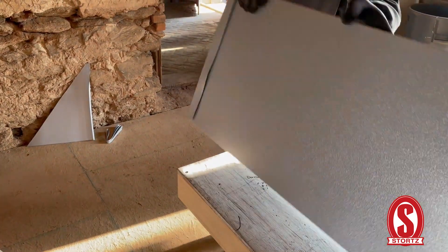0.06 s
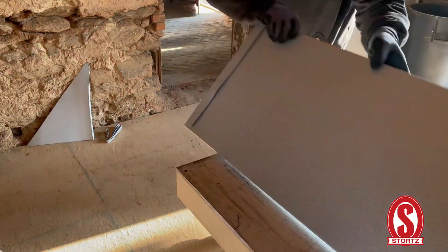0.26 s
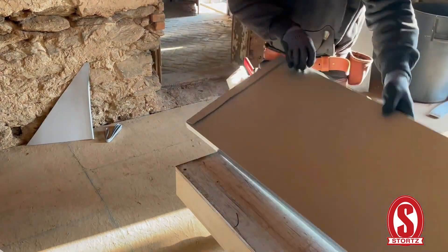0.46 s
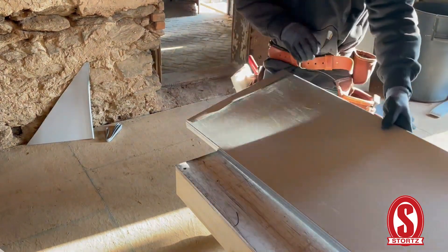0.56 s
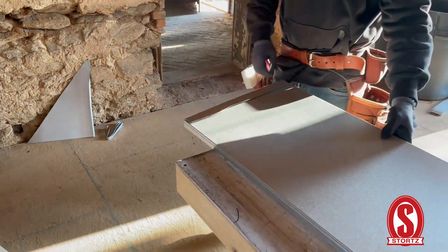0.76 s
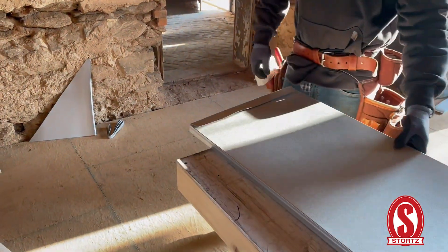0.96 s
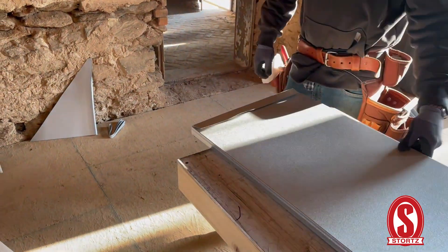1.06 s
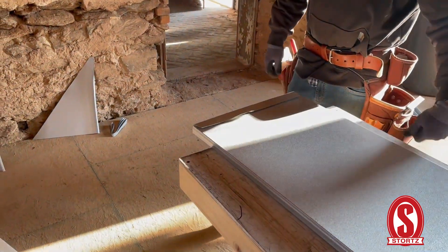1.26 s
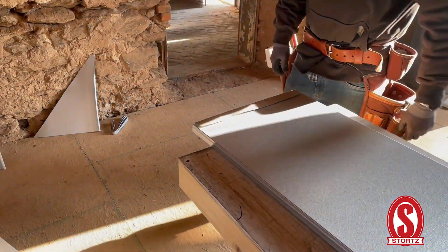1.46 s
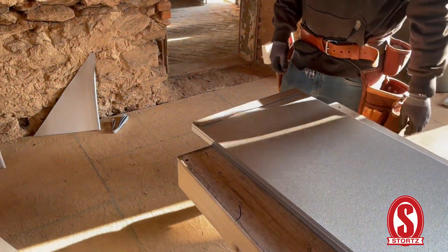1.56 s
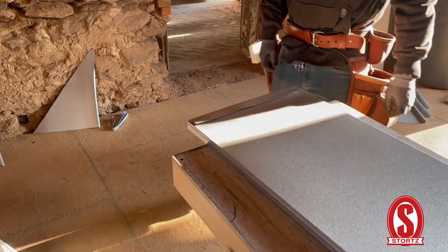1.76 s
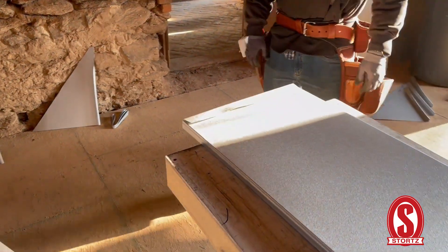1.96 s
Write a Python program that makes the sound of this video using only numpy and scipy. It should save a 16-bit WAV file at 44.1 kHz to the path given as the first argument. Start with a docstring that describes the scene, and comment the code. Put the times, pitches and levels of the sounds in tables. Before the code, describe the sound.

A large metal sheet clacks onto a wooden bench, rumbles, then falls flat with a boom.

```python
"""A large sheet metal panel is lowered onto a wooden bench in a stone-walled building, one microphone nearby.
The sheet murmurs in the hands; at 0.2 s its folded edge clacks on the wood and the bench thuds.
Tipped on that edge it rumbles as it flexes and slides, a glove slips off, and at 1.2 s it falls flat and
booms. After each blow the ringing swells, spreading from the low modes into the middle ones.
As it dies away the sheet settles with a few tiny ticks."""
import sys
import numpy as np
from scipy import signal
from scipy.fft import rfft, irfft
from scipy.io import wavfile

SR = 44100
rng = np.random.default_rng(int(sys.argv[2]) if len(sys.argv) > 2 else 0)


def unload_audio(sound):
    """Save the sound as a 16-bit wav file, at the path given as the first command line argument."""
    columns = np.transpose(np.atleast_2d(sound))
    # keep every value between -1 and 1, then stretch to whole-number steps
    steps = np.round(np.clip(columns, -1, 1) * 32767)
    wavfile.write(sys.argv[1], SR, steps.astype(np.int16))


N = 88200
T = np.arange(N) / SR
HZ = np.fft.rfftfreq(N, 1 / SR)
EDGE_S, FLAT_S = 0.214, 1.155  # the edge lands; the sheet falls flat


def panel():
    """The panel rumbles while tipped on its edge, then booms as it falls flat."""
    # crowded modes in each position (frequency [Hz], level [dB], swell [s], hold [s], t60 [s])
    tipped_bands = [(50, -50, .05, 0.69, 4), (115, -41.5, .05, 0.79, 1.4),
                    (226.5, -34.5, 0.046, 0.21, 3.03), (361, -24.5, .16, 0.32, 2.22),
                    (589, -26, 0.13, 0.45, 2.15), (904, -29.5, 0.23, 0.26, 2.65),
                    (1523, -38.5, 0.08, 0.16, 2.93), (2600, -50.5, .05, .2, 1.8)]
    flat_bands = [(51.3, -46.5, .01, 0.27, 3.4), (115, -31.5, 0.009, 0.033, 1.37),
                  (216, -32.5, 0.019, 0.22, 1.05), (367, -22.5, 0.012, 0.17, 1.48),
                  (595, -18, 0.08, 0.059, 1.675), (948, -18.5, 0.12, 0.035, 1.7),
                  (1520, -23.5, 0.17, .04, 1.51), (2584, -33, 0.025, 0.14, 1.27),
                  (4260, -36.5, 0.012, 0.016, 1.1), (7400, -36, 0.022, 0.01, 0.75),
                  (12200, -41.5, 0.013, 0.0055, .58)]
    # the strongest modes; energy passes among them, so each peaks at its own delay after a landing
    # (frequency [Hz], tipped level [dB], tipped delay [s], flat level [dB], flat delay [s])
    modes = [(245, -30, 0.06, -32.5, 0.2), (323, -25.5, 0.36, -21, 0.0033), (348, -29, .33, -28.5, 0.11),
             (384.2, -26.5, 0.47, -22.5, 0.12), (425, -36.5, 0.64, -22, 0.13),
             (460, -31.5, 0.45, -26.5, 0.067), (504, -30, 0.067, -39, 0.056),
             (541.6, -33, 0.083, -27.5, 0.24), (582, -28.5, 0.56, -18.5, 0.047),
             (709.3, -30.5, 0.72, -21, 0.14), (842.3, -32, 0.39, -26, 0.14), (973, -38.5, 0.1, -27.5, 0.11),
             (1038, -31, 0.12, -34, .25), (1085, -47.5, 0.21, -33.5, 0.12), (1140, -38, 0.16, -37, 0.47),
             (1334, -47.5, .25, -32, 0.24), (1451, -44, 0.34, -37, 0.3), (1556, -44, .2, -38.5, 0.39)]
    tipped_modes = [row[:3] for row in modes]
    flat_modes = [(row[0], *row[3:]) for row in modes]
    rumble = sheet(EDGE_S, tipped_bands, tipped_modes, sudden=0.41, flex=0.01948, flex_hz=9.35,
                   beating=0.38)
    boom = sheet(FLAT_S, flat_bands, flat_modes, sudden=1.0, flex=0.007, flex_hz=12, beating=0.46)
    return rumble + boom


def sheet(start, bands, modes, sudden, flex, flex_hz, beating):
    """After a landing the sheet's modes swell and decay; flexing bends the pitch of the strongest."""
    # ringing present at the moment of landing, before scaling by `sudden` (frequency [Hz], share [0-1])
    onset_share = [(100, .8), (330, 0.74), (600, 0.24), (1000, 0.32), (1600, 0.53), (2600, .7),
                   (8000, 0.42)]
    # gaps between the modes (frequency [Hz], width [Hz], gain [dB])
    gaps = [(187, 35, -4.5), (299, 49, -4.5), (621, 54, -5), (780, 40, 1.5), (928, 39, -8), (1176, 45, -3),
            (3090, 690, -8)]
    t = T - start

    def bloom(hz, swell, hold, t60):
        at_once = np.clip(sudden * read(onset_share, hz), 0, 1)
        attack = np.clip(t / 0.00091, 0, 1)
        growth = at_once + (1 - at_once) * np.clip(t / max(swell, 1e-3), 0, 1)
        return attack * growth * fade(t - swell - hold, t60)

    centres, t60s = [row[0] for row in bands], [row[-1] for row in bands]
    octaves_above_top = np.maximum(np.log2((HZ + 1) / centres[-1]) - 0.12, 0)
    colour = amp(bumps(gaps) - 33 * octaves_above_top) * (HZ > 20)
    ringing = np.zeros(N)
    for k, (hz, db, *shape) in enumerate(bands):
        crowd = irfft(rfft(rng.standard_normal(N)) * band(centres, k) * colour, N)
        ringing += amp(db) * unit(crowd) * bloom(hz, *shape)
    for hz, db, delay in modes:
        turns = np.cumsum(hz * (1 + flex * drift(flex_hz))) / SR + rng.random()
        tone = unit((1 + beating * drift(23)) * np.sin(2 * np.pi * turns))
        ringing += amp(db) * tone * bloom(hz, delay, 0, 0.95 * np.interp(hz, centres, t60s))
    return ringing


def knocks():
    """Hard contacts with the bench ring the folded edge briefly and echo from the walls."""
    # the edge meeting the wood (time [s], level [dB], brightness [dB per octave])
    contacts = [(0.2042, -21.5, -3), (0.2084, -23, -3.5), (0.2107, -17, 4), (0.2144, -8, 3.5),
                (0.2174, -9.5, -5.5), (0.2228, -13.5, -8), (0.513, -30, -0.5), (0.614, -34.5, -1)]
    # resonances of the fold (frequency [Hz], width [Hz], gain [dB])
    fold = [(2270, 200, 0), (4680, 850, 7.5), (9330, 1800, 14)]
    # colour of a knock, and what the walls do to it (frequency [Hz], gain [dB])
    knock_colour = [(100, -4.5), (500, -1), (1000, 0.5), (1800, 0), (3200, -7.5), (6500, -12), (10200, -20),
                    (11500, -25), (16000, -36.5)]
    echo_colour = [(100, -9.5), (1000, 0), (4600, 5), (7500, -2.5), (9500, -10.5), (12000, -1.5),
                   (16000, -4)]
    octaves = np.log2(np.maximum(HZ, 500) / 3000)
    treble_hz, echo_db = 6500, -13.5
    direct, echo = np.zeros((2, N))
    for s, db, brightness in contacts:
        colour = read(knock_colour, HZ) + bumps(fold) + brightness * octaves
        burst = noise(colour)
        body = irfft(rfft(burst) / (1 + (HZ / treble_hz) ** 8), N)
        treble = amp(1) * (burst - body) * strike(s, t60=0.0095, rise_s=0.00095)  # dies sooner
        direct += amp(db) * (body * strike(s, t60=0.035, rise_s=0.00072) + treble)
        echo += amp(db) * room(s, colour)
    return direct + tint(echo, echo_db + read(echo_colour, HZ))


def edge_ring():
    """The folded edge pings under its hardest knock."""
    # modes of the edge (frequency [Hz], level [dB], t60 [s])
    modes = [(4400, -35, .42), (4650, -39, 0.22), (5600, -37, 0.37), (9300, -12.5, .014)]
    return ring(modes, EDGE_S, rise_s=0.0008)


def slaps():
    """The face of the sheet slaps the wood, its far side just after."""
    # (time [s], level [dB], rise [s], t60 [s], centre [Hz], half-width [octaves])
    blows = [(1.1554, -20, 0.00026, 0.032, 1390, 1.3), (1.160, -22.5, 0.0026, 0.063, 1680, 0.95),
             (1.173, -26, .005, 0.065, 6740, 0.17)]
    sound = np.zeros(N)
    for s, db, rise_s, t60, hz, half_width in blows:
        off_centre = np.log2((HZ + 1) / hz) / half_width
        sound += amp(db) * noise(-10 * np.log10(1 + off_centre ** 4)) * strike(s, t60, rise_s)
    return sound


def bench():
    """The wooden bench rings briefly under the edge and thuds with the panel's weight."""
    # modes of the bench (frequency [Hz], level [dB], t60 [s])
    modes = [(37.95, -22.5, 0.59), (57.2, -21.5, 0.15), (620, -13.5, .06), (1028, -12, 0.056)]
    # colour of the dull thud (frequency [Hz], gain [dB])
    thud_colour = [(20, -13.5), (35, -6.5), (70, -2.5), (115, 2), (165, 0), (230, -14), (400, -28),
                   (2000, -72)]
    thud_s, colour = 0.2135, read(thud_colour, HZ)
    wood = ring(modes, EDGE_S, rise_s=0.003)
    thud = noise(colour) * strike(thud_s, t60=0.05, rise_s=0.0015)
    echo = amp(-12.5) * room(thud_s, colour)
    return wood + amp(-16) * (thud + echo)


def shakes():
    """The sheet murmurs as it shakes softly in the hands."""
    # each shake (time [s], level [dB])
    jolts = [(0, -29.5), (0.096, -32.5)]
    # colour of the murmur (frequency [Hz], gain [dB])
    colour = [(60, -14.5), (200, -1.5), (500, 4.5), (900, -1.5), (1600, -17), (3000, -29), (16000, -67.5)]
    return sum(amp(db) * noise(read(colour, HZ)) * strike(s, t60=0.4, rise_s=0.00068) for s, db in jolts)


def slide():
    """The folded edge scrapes unevenly over the wood."""
    # course of the scrape (time [s], level [dB])
    levels = [(0, -44.5), (.06, -43), (.105, -37.5), (.19, -47), (.4, -46), (.5, -47.5), (.57, -45.5),
              (.66, -47.5), (.8, -58.5), (1.0, -57), (1.2, -53), (1.7, -59.5), (2, -71.5)]
    # colour of the scrape (frequency [Hz], gain [dB])
    colour = [(300, -6), (1500, 7), (3200, -0.5), (4300, 0.5), (5300, 0), (6800, -8.5), (9000, -10),
              (13000, -17.5), (16000, -23.5)]
    return noise(read(colour, HZ)) * amp(np.interp(T, *np.transpose(levels)) + drift(70))


def skid():
    """The edge skids a little after it lands, with a thin ring and a burst of hiss."""
    # colour of the skid (frequency [Hz], gain [dB])
    colour = [(2000, -25), (4700, -11), (5300, 2), (6400, -14), (9000, -16), (13000, -18), (16000, -22)]
    return amp(-46.5 + 1.5 * drift(80)) * noise(read(colour, HZ)) * strike(0.508, t60=0.43, rise_s=0.0027)


def glove():
    """A glove slips off the sheet just before it falls."""
    # colour of the rubbing (frequency [Hz], gain [dB])
    colour = [(1000, -3), (2000, 3), (3300, -2.5), (4500, 5.5), (5700, 1), (7000, -4.5), (10000, -9.5),
              (12300, -7.5), (16000, -14.5)]
    start_s, rise_s = 0.81, 0.2
    slip = np.clip((T - start_s) / rise_s, 0, 1) * fade(T - FLAT_S, t60=0.3)
    return slip * noise(read(colour, HZ)) * amp(-49 + 0.8 * drift(90))


def ticks():
    """The sheet ticks as it settles, each tick with a faint tail."""
    # each tick (time [s], level [dB])
    settling = [(1.867, -52), (1.885, -66), (1.976, -58)]
    # colour of a tick (frequency [Hz], gain [dB])
    colour = [(1000, -25), (4000, -9), (8500, -3), (12000, -9), (16000, -20)]
    sound = np.zeros(N)
    for s, db in settling:
        tail = amp(-23) * strike(s, t60=0.19, rise_s=0.0037)
        sound += amp(db) * noise(read(colour, HZ)) * (strike(s, t60=0.012, rise_s=0.00047) + tail)
    return sound


def room(start, colour_db):
    """Diffuse answer of the stone walls to a short sound of the given colour, treble dying first."""
    # reverberation of the building (frequency [Hz], t60 [s])
    decays = [(100, 0.36), (1000, 0.69), (4500, 0.39), (9000, 0.29), (16000, 0.1)]
    spectrum, centres = rfft(noise(colour_db)), [hz for hz, _ in decays]
    return sum(irfft(spectrum * band(centres, k), N) * strike(start + 0.0011, t60, rise_s=0.0029)
               for k, (_, t60) in enumerate(decays))


def air():
    """Room tone: the quiet air of the building."""
    # colour of the air (frequency [Hz], gain [dB])
    colour = [(20, 3.5), (60, -8), (150, 3.5), (500, -15.5), (1500, -15.5), (4000, -36), (16000, -48.5)]
    return amp(-43) * noise(read(colour, HZ))


def ring(modes, start, rise_s):
    """Struck modes ring as decaying sines of random phase."""
    return sum(amp(db) * np.sin(2 * np.pi * (hz * T + rng.random())) * strike(start, t60, rise_s)
               for hz, db, t60 in modes)


def strike(start, t60, rise_s):
    """A quick rise and a decay."""
    return np.clip((T - start) / rise_s, 0, 1) * fade(T - start, t60)


def fade(t, t60):
    """Full level until time zero, then an exponential decay."""
    return np.exp(-np.log(1000) * np.maximum(t, 0) / max(t60, 1e-3))


def drift(rate_hz):
    """A random curve of rms 1, wandering at up to about the given rate."""
    return unit(irfft(rfft(rng.standard_normal(N)) * np.exp(-(HZ / rate_hz) ** 2) * (HZ > 0), N))


def noise(colour_db):
    """Noise of rms 1 with the given colour."""
    return unit(tint(rng.standard_normal(N), colour_db))


def tint(x, db):
    """Filters by a gain in dB for every frequency."""
    return irfft(rfft(x) * amp(db), N)


def band(centres, k):
    """Gain of band k, crossing over smoothly into its neighbours."""
    share = read(list(zip(centres, np.eye(len(centres))[k])), HZ)
    return np.sin(np.pi / 2 * share) ** 2


def bumps(rows):
    """Gain in dB of a set of resonances or gaps."""
    return sum(db / (1 + (2 * (HZ - hz) / width) ** 2) for hz, width, db in rows)


def read(points, hz):
    """Reads a table on a log-frequency axis."""
    f, value = np.transpose(points)
    return np.interp(np.log(hz + 1), np.log(f + 1), value)


def amp(db):
    """Decibels to gain."""
    return 10 ** (np.asarray(db) / 20)


def unit(x):
    """Scales to rms 1."""
    return x / np.sqrt(np.mean(x ** 2) + 1e-20)


def scene():
    """Both landings and the handling, heard in mono near the bench, over the room tone."""
    landings = panel() + knocks() + edge_ring() + slaps() + bench()
    handling = shakes() + slide() + skid() + glove()
    return (landings + handling + ticks() + air())[None]


def record(dry):
    """The recorder's band limit."""
    cutoff_hz = 15780
    lowpass = signal.firwin(511, cutoff_hz, window=("kaiser", 9), fs=SR)
    return signal.oaconvolve(dry, lowpass[None], "same")


dry = scene()
out = record(dry)
unload_audio(out)
```